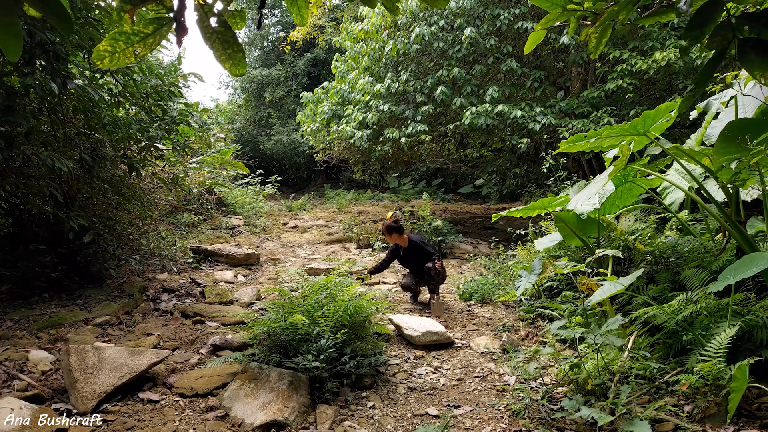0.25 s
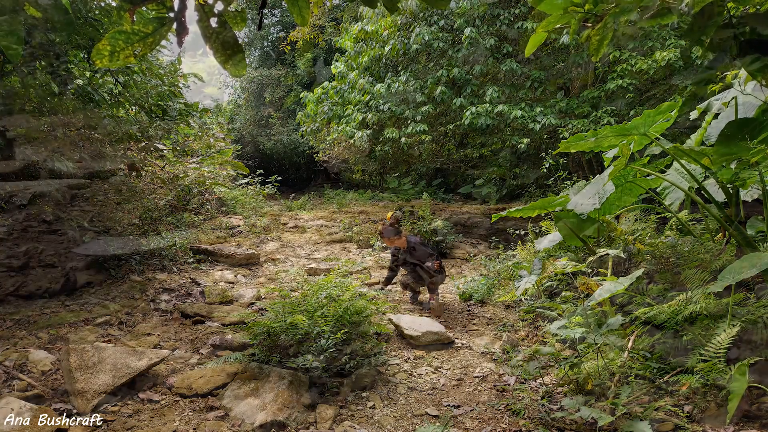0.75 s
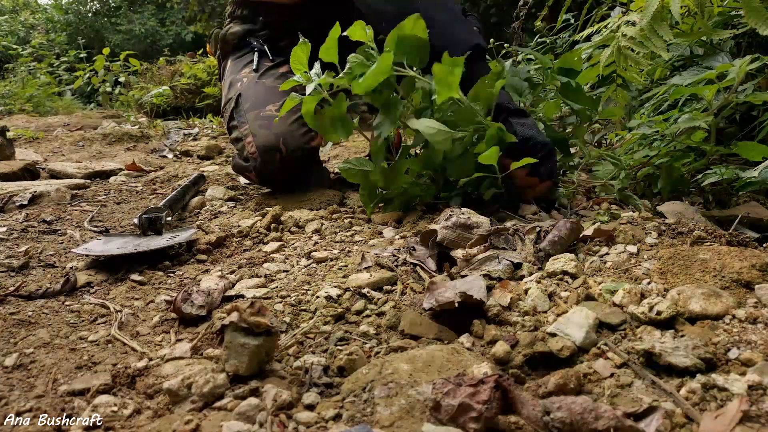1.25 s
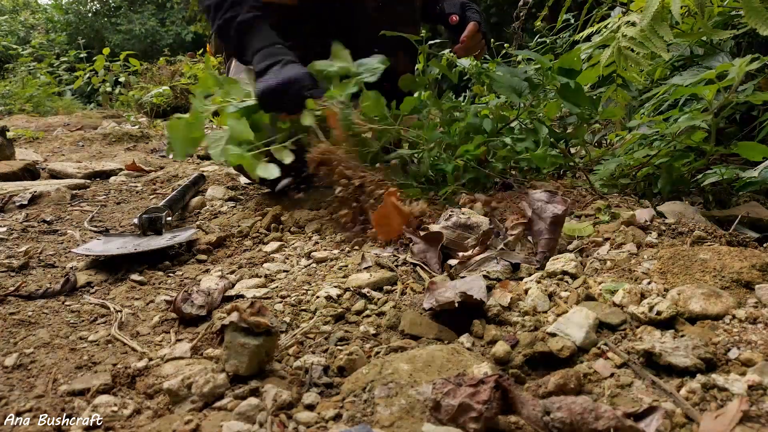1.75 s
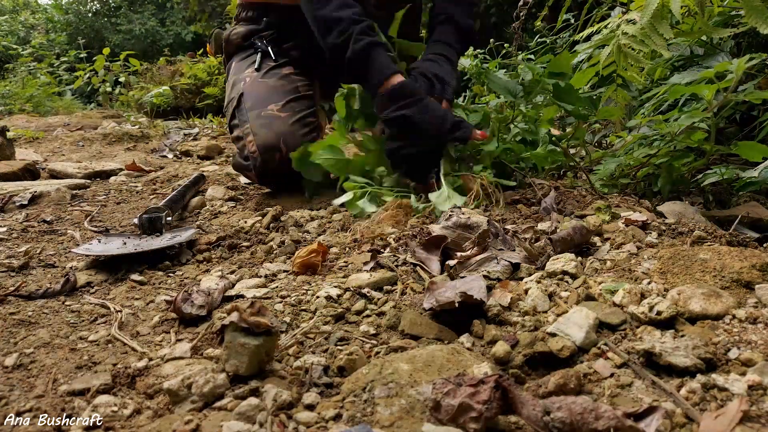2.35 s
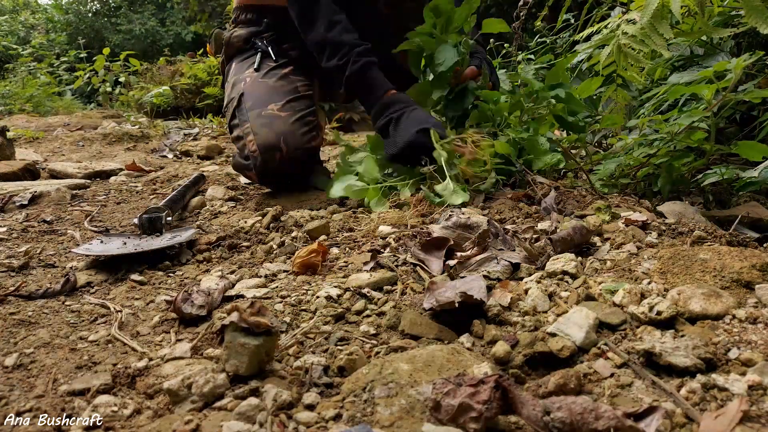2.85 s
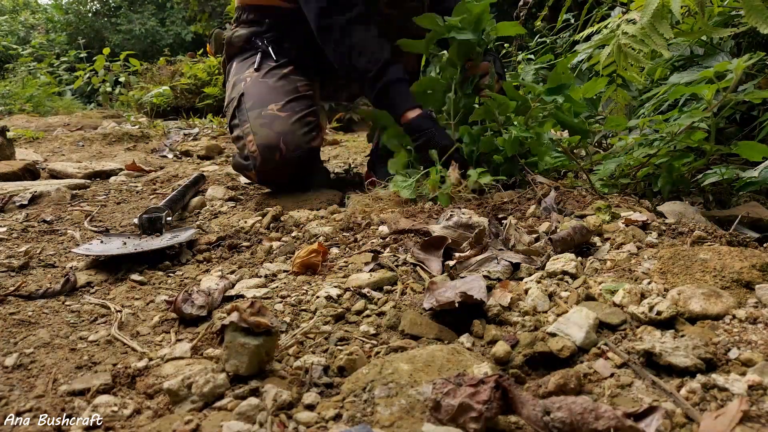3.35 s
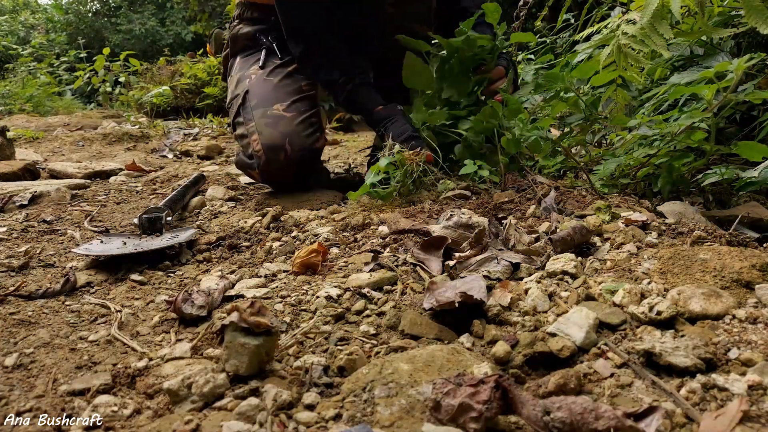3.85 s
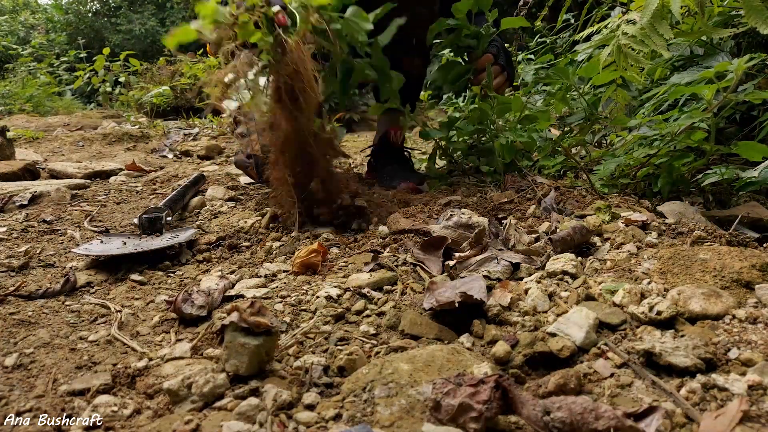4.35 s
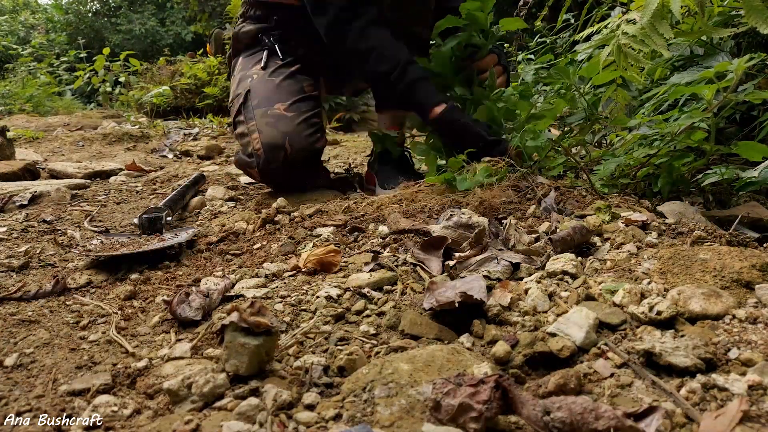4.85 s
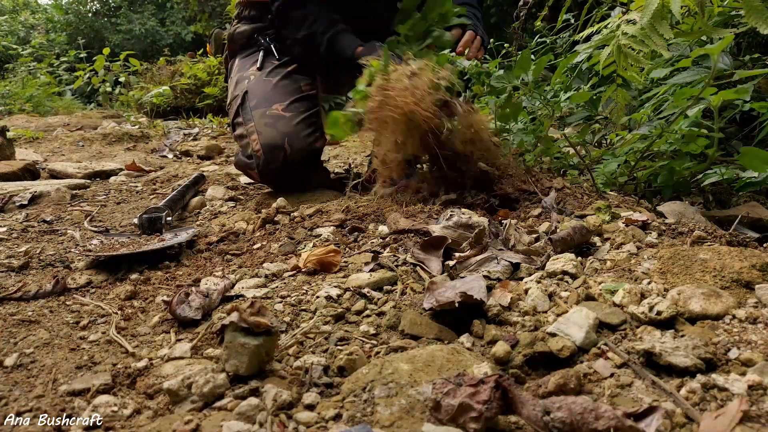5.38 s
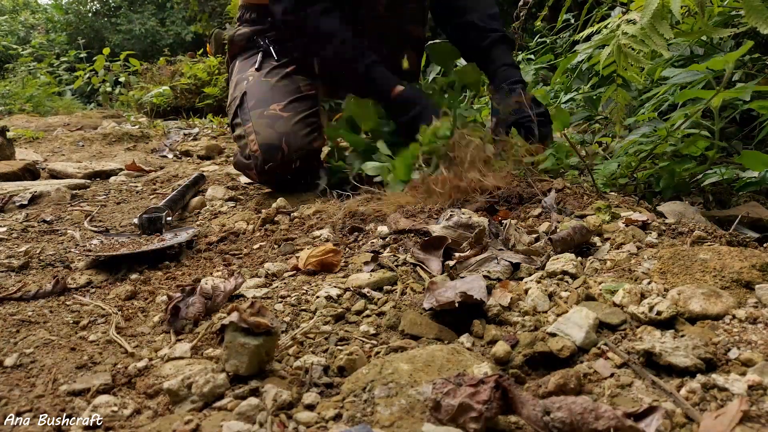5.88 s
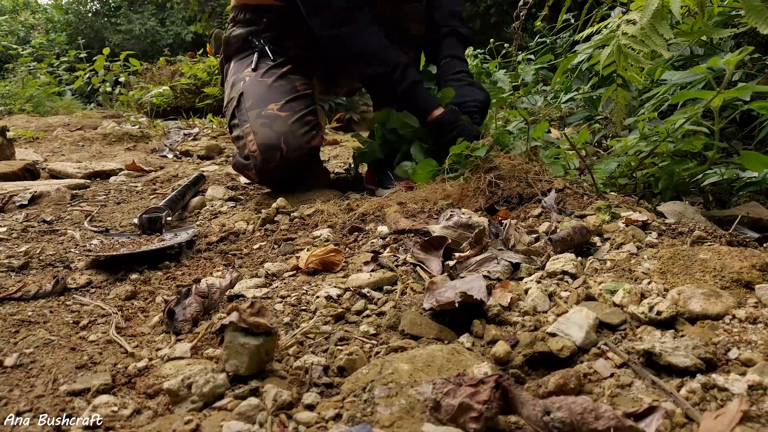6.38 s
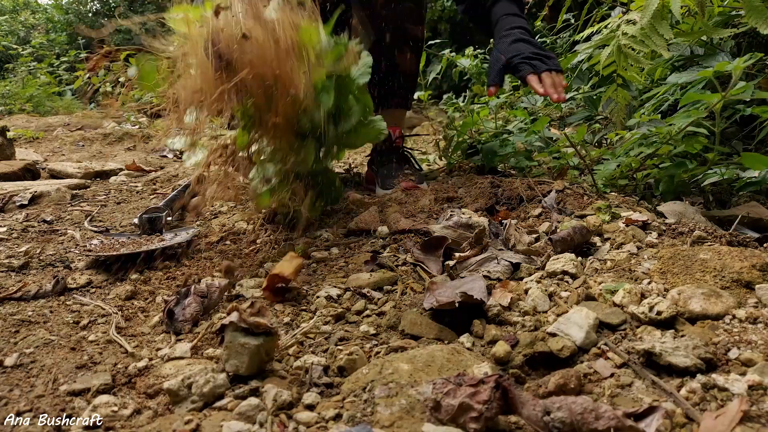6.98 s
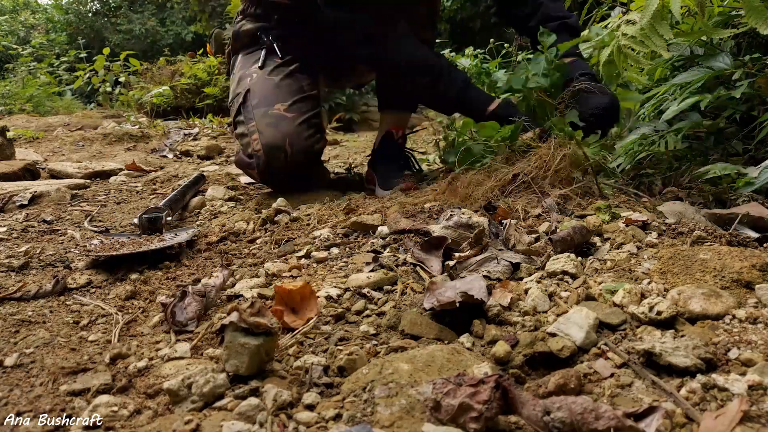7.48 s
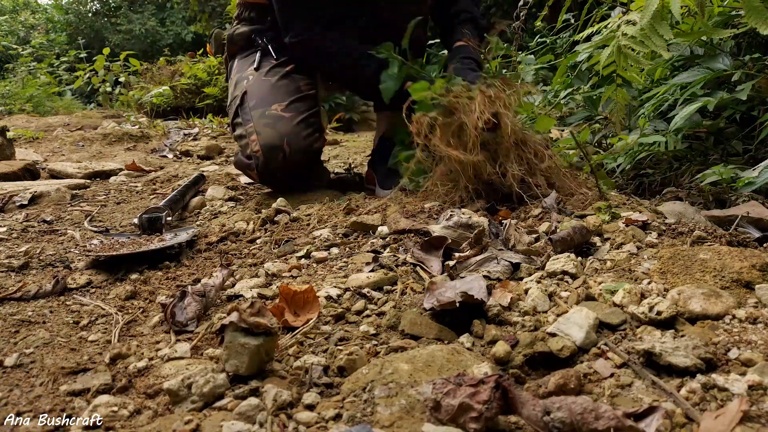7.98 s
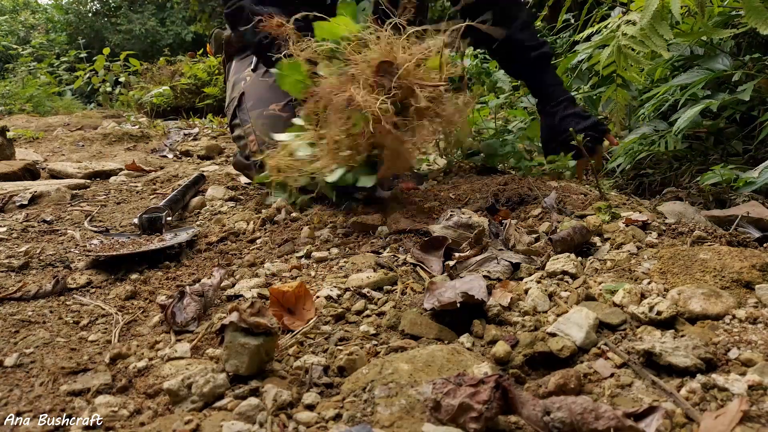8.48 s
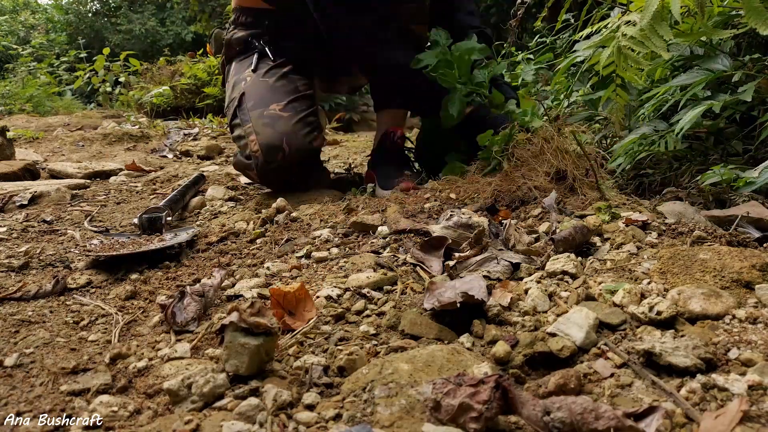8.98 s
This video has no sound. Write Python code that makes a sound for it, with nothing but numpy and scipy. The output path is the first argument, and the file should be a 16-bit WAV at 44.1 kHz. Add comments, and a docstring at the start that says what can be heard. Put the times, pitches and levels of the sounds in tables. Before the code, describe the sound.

Close stereo view of weeding on a stony forest path. Faint air and thin insect drone lie underneath. After two far, dull knocks, leaves swish in uneven sweeps, fibrous roots tear with muffled cracks and low thuds, and pebbles patter. A bright, short metallic clink comes from the left early on. Later pulls bring sharper stone clicks, thin twig snaps and brief showers of grit slightly left.

```python
"""Weeds are pulled out of stony ground on a forest path, over still air and faint insect drones.
Two distant knocks come first, as dull bursts trailed by grit. Then, close by, sweeps and tugs shape streams
of tiny damped rings into rustling leaves, creaking roots and crumbling soil; thuds and root snaps join them.
From 1.4 s pebbles click and soil showers down; from 1.9 s a steel trowel to the left clinks when touched,
ringing its modes; then dry twigs tick and loose stones knock together."""
import sys
import numpy as np
from scipy import signal
from scipy.fft import rfft, irfft, next_fast_len
from scipy.io import wavfile
from scipy.ndimage import uniform_filter1d, map_coordinates

SR = 44100
rng = np.random.default_rng(int(sys.argv[2]) if len(sys.argv) > 2 else 0)


def wrap_up_sound(samples):
    """Save the sound to the file named by the first command line argument, as 16-bit audio."""
    columns = np.atleast_2d(samples).T
    # keep every value between -1 and 1, then stretch to whole-number steps
    tamed = np.clip(columns, -1, 1)
    steps = np.round(tamed * 32767).astype(np.int16)
    wavfile.write(sys.argv[1], SR, steps)


N = 407043
LEAD_IN_S = .012  # time before contact within each burst

# Tone of dry twigs and stalks. Each row: frequency in Hz, gain in dB.
DRY_TONE = [(300, -7), (1800, -0.5), (7000, 3), (15000, -7.5)]


def amp(db):
    """Amplitude ratio of a level in dB."""
    return 10 ** (np.asarray(db) / 20)


def unit(x):
    """Scale to an RMS of 1."""
    return x / np.sqrt(np.mean(x ** 2) + 1e-20)


def along(points, hz):
    """Interpolate (Hz, value) points on a log frequency axis."""
    f, v = np.transpose(points)
    return np.interp(np.log(hz + 1), np.log(f), v)


def wobble(knots_per_s):
    """A smooth random curve through evenly spaced knots."""
    knots = rng.standard_normal(int(N * knots_per_s / SR) + 4)
    return map_coordinates(knots, [np.arange(N) * knots_per_s / SR])


def add(track, s, sound):
    """Mix a sound into a stereo track at s seconds."""
    part = track[:, round(s * SR):][:, :sound.shape[-1]]
    part += sound[..., :part.shape[1]]


def colour(x, spectrum):
    """Causal minimum-phase filter with the gain of (Hz, dB) points, built by folding the cepstrum."""
    size = x.shape[-1]
    m = 2 * next_fast_len(size // 2 + 1024)
    gain = amp(along(spectrum, np.fft.rfftfreq(m, 1 / SR)))
    cepstrum = irfft(np.log(gain))
    cepstrum[1:m // 2] *= 2
    cepstrum[m // 2 + 1:] = 0
    response = np.exp(rfft(cepstrum))
    return irfft(rfft(x, m) * response, m)[..., :size]


def spread(pair):
    """Two unrelated signals become left and right: most alike in the low mids, apart in the treble."""
    # Each row: frequency in Hz, left-right correlation.
    likeness = [(60, 0.26), (250, 0.83), (650, 0.75), (1400, 0.21), (3100, 0.3), (7000, 0)]
    size = pair.shape[1]
    m = next_fast_len(size + 512)
    turn = np.arccos(np.clip(along(likeness, np.fft.rfftfreq(m, 1 / SR)), -1, 1)) / 2
    mid, side = irfft(rfft(pair, m) * [np.cos(turn), np.sin(turn)], m)[:, :size]
    return np.array([mid + side, mid - side])


def grains(rate_per_s, top_hz, life_s, scatter_db):
    """Stereo stream of tiny damped rings, many small and a few large, of any pitch below top_hz."""
    draws = rng.random((int(rate_per_s * N / SR), 5))
    when, pitch, size, left, right = draws.T[:, :, None]
    k = np.arange(int(5 * life_s * SR))
    level_db = scatter_db * np.minimum(-np.log(1 - size), 4)
    envelope = amp(level_db) * np.exp(-k / SR / life_s)
    at = ((when * N).astype(int) + k).ravel()
    pair = []
    for phase in (left, right):
        ring = envelope * np.sin(2 * np.pi * (pitch * top_hz * k / SR + phase))
        pair.append(np.bincount(at, ring.ravel(), N)[:N])
    return unit(np.array(pair))


def shifting(pair, patchy_db):
    """The colour drifts at random over time and pitch as other leaves and crumbs come into play."""
    z = signal.stft(pair, nperseg=512)[2]
    field = uniform_filter1d(rng.standard_normal(z.shape[1:]), 4, axis=0)
    field = uniform_filter1d(field, 8, axis=1)
    return signal.istft(z * amp(patchy_db * unit(field)), nperseg=512)[1][:, :N]


def strokes(rows):
    """Strength of a series of hand movements: each swells to its peak and dies away; powers add."""
    shape = 1.48  # 1 = pointed swell, 2 = round swell
    t = np.arange(N) / SR
    power = np.zeros(N)
    for s, db, rise_s, fall_s in rows:
        near = (t > s - 5 * rise_s) & (t < s + 5 * fall_s)
        away = np.abs(t[near] - s) / np.where(t[near] < s, rise_s, fall_s)
        power[near] += (amp(db) * np.exp(-away ** shape)) ** 2
    return np.sqrt(power)


def burst(spectrum, t60, tail_db, tail_t60, lead=0, shape_db=2, crush_db=-14, crush_s=0.011):
    """One contact: grit crushes, a crack reaches the left ear lead samples early, loose bits scatter."""
    step_hz = np.geomspace(100, 16000, 32)
    t = np.arange(SR // 5) / SR - LEAD_IN_S
    after = np.maximum(t, 0)
    fall = (t >= 0) * amp(-60 * after / max(t60, .002))
    crush = amp(crush_db) * np.exp(-np.abs(t) / crush_s)
    tail = amp(tail_db - 60 * after / max(tail_t60, .01))
    scatter = np.where(t < 0, crush, tail)
    direct = fall * rng.choice([-1, 1], len(t))
    left = np.roll(direct, max(-round(lead), 0))
    right = np.roll(direct, max(round(lead), 0))
    loose = spread(scatter * rng.standard_normal((2, len(t)))) / np.sqrt(2)
    # no two stones or roots ring alike
    own_db = along(spectrum, step_hz) + shape_db * rng.standard_normal(len(step_hz))
    crack = colour(np.array([left, right]) + loose, [spectrum[0], *zip(step_hz, own_db)])
    # filtering keeps the energy of the envelopes
    return crack * np.sqrt(np.sum(fall ** 2 + scatter ** 2) / np.sum(crack ** 2) / 2)


def pulling():
    """Tugs pop fibres and crumble soil, with dry bits crackling; sweeps brush leaves into a fine hiss."""
    # Tugs at a root. Each row: peak in seconds, relative level in dB, rise in s, fall in s.
    tugs = [(1.18, -50, 0.017, 0.016), (1.3, -41.5, 0.084, 0.12), (1.519, -36, 0.082, 0.12),
            (1.75, -38.5, 0.22, 0.12), (2.383, -43, 0.1, 0.068), (2.87, -38.5, 0.035, 0.017),
            (3.03, -45, 0.033, 0.039), (3.463, -41.5, 0.062, 0.034), (3.925, -39.5, 0.05, 0.11),
            (4.13, -43.5, 0.017, 0.11), (4.329, -41.5, 0.045, 0.11), (5.22, -42.5, 0.024, 0.12),
            (5.906, -38.5, 0.046, 0.086), (6.575, -42.5, 0.12, 0.051), (6.68, -42.5, 0.062, 0.38),
            (6.975, -37, 0.014, 0.041), (7.91, -46, 0.27, 0.19), (8.36, -36.5, 0.013, 0.0096),
            (8.543, -42, 0.027, 0.063)]
    # Hands and plants through foliage. Each row: peak in seconds, relative level in dB, rise in s, fall in s,
    # leaf-edge level over leaf level in dB.
    sweeps = [(1.175, -30.5, 0.065, 0.022, -1), (1.301, -37.5, 0.019, 0.068, 2.5),
              (1.552, -27, 0.056, 0.25, 0), (1.836, -37.5, 0.066, 0.13, 3), (2.238, -35.5, 0.12, 0.28, -1),
              (2.721, -35.5, 0.057, 0.034, 0), (3.06, -37, 0.42, 0.05, -2), (3.45, -31.5, 0.037, 0.09, 3.5),
              (3.6, -35, 0.063, 0.075, 0.5), (3.713, -34.5, 0.031, 0.1, -3), (3.945, -34, 0.049, 0.21, -3),
              (4.153, -37, 0.021, 0.045, -3), (4.349, -36, 0.23, 0.11, -1), (4.58, -30.5, 0.099, 0.2, 3),
              (4.994, -45.5, 0.14, 0.11, 12), (5.651, -31, 0.023, 0.24, 2.5),
              (6.412, -47.5, 0.06, 0.025, 9), (6.726, -31.5, 0.14, 0.21, -2.5),
              (7.032, -27.5, 0.16, 0.14, -0.5), (7.204, -33.5, 0.045, 0.18, -1),
              (8.13, -37, 0.12, 0.16, -4), (8.353, -28.5, 0.061, 0.063, 2), (8.5, -34.5, 0.13, 0.095, 0.5),
              (8.682, -38.5, 0.049, 0.099, -2.5), (9.227, -37.5, 0.1, 0.05, -5)]
    # Light rustle held between sweeps. Each row: time in seconds, relative level in dB.
    holding = [(0.9, -59.5), (1.0, -37), (2.1, -51), (3.3, -37), (3.85, -53.5), (5.449, -39.5),
               (6.25, -47.5), (7.6, -44.5), (8.998, -49.5)]
    # Tones of leaves, leaf edges, roots and crumbs. Each row: frequency in Hz, gain in dB.
    leaf_tone = [(1000, -12), (1500, -12), (1800, -2.5), (2150, -3), (2500, -8), (4000, -4), (7700, -2.5),
                 (8900, -12.5), (16000, -28)]
    fizz_tone = [(5500, -22), (8200, 0), (10800, -1.5), (12700, 2.5), (16000, -3.5)]
    root_tone = [(25, -24), (60, -15), (110, -7), (175, -3.5), (260, -3), (370, 1), (650, -3.5),
                 (1100, -10.5), (3000, -23)]
    crumb_tone = [(200, -20), (680, 1.5), (1020, -2), (1350, 3.5), (2100, 2.5), (2600, -5), (4000, -6),
                  (9000, -30)]
    root_db, soil_db, leaf_db, fizz_db = -1.25, 0.15, -3, -4.5
    drag_soil_db, drag_root_db = -10.5, -14.5  # moving foliage also drags on the soil and its own roots
    crackle_db, crackle_max_db = -2, -41.5  # relative level, and the ceiling on the crackle level
    crackle_spread_db, tick_s = 14, 0.0007  # most dry bits are tiny, a few stand out; decay of a tick
    jerk_db = 0.9  # unsteadiness of the hands

    tug = strokes(tugs)
    held = amp(np.interp(np.arange(N) / SR, *np.transpose(holding), left=-120))
    foliage = np.hypot(strokes([row[:4] for row in sweeps]), held)
    edge_rows = [(s, db + bright_db, rise, fall) for s, db, rise, fall, bright_db in sweeps]
    edges = np.hypot(strokes(edge_rows), held)
    root = np.hypot(amp(root_db) * tug, amp(drag_root_db) * foliage)
    soil = np.hypot(amp(soil_db) * tug, amp(drag_soil_db) * foliage)
    dry_bits = np.minimum(amp(crackle_db) * soil, amp(crackle_max_db))
    jerk = amp(jerk_db * wobble(40))

    fibres = grains(rate_per_s=900, top_hz=1400, life_s=0.003, scatter_db=3.1)
    crumbs = grains(rate_per_s=1100, top_hz=5000, life_s=0.0005, scatter_db=3.7)
    crumbs = shifting(crumbs, patchy_db=2.8)
    leaves = grains(rate_per_s=5000, top_hz=17300, life_s=0.00022, scatter_db=2)
    leaves = shifting(leaves + rng.standard_normal((2, N)), patchy_db=1.8)
    crackle = np.zeros((2, N))
    for when, size, side in rng.random((700, 3)):
        tick = np.exp(-np.arange(256) / SR / tick_s) * rng.standard_normal((2, 256))
        pan = np.sqrt([[side], [1 - side]])
        add(crackle, when * N / SR, amp(crackle_spread_db * size ** 2) * tick * pan)

    rustle = amp(leaf_db) * foliage * unit(colour(spread(leaves), leaf_tone))
    # time-reversed leaves make an unrelated hiss
    fizz = amp(fizz_db) * edges * unit(colour(spread(leaves[:, ::-1]), fizz_tone))
    creak = root * unit(colour(spread(fibres), root_tone))
    crumble = soil * unit(colour(spread(crumbs), crumb_tone))
    crackle = dry_bits * unit(colour(shifting(crackle, patchy_db=4.5), DRY_TONE))
    return jerk * (creak + crumble + rustle + fizz) + crackle


def snaps():
    """A root breaks under the soil with a short, muffled crack."""
    # Each row: time in seconds, relative level in dB.
    snap_rows = [(1.325, -21.5), (1.632, -27), (1.647, -23), (2.823, -25), (2.944, -21), (3.031, -21.5),
                 (3.884, -23.5), (3.892, -22), (3.915, -22.5), (3.937, -23), (3.949, -23.5), (4.114, -18),
                 (4.133, -22), (4.155, -30), (4.182, -29), (4.324, -26), (5.153, -28.5), (5.2, -22.5),
                 (5.243, -24), (5.291, -25.5), (5.32, -24.5), (6.8, -22.5), (6.544, -22), (6.566, -17.5),
                 (7.125, -18), (7.552, -27), (7.866, -27.5), (7.902, -25), (7.942, -28), (8.506, -25),
                 (9.026, -29.5), (9.052, -20), (9.158, -23.5), (9.172, -24)]
    # Each row: frequency in Hz, gain in dB.
    snap_tone = [(25, -31), (100, -7.5), (200, 1.5), (450, 5), (1200, -2), (2100, -2), (2900, -19.5),
                 (6000, -20.5), (16000, -28)]
    out = np.zeros((2, N))
    for s, db in snap_rows:
        crack = burst(snap_tone, t60=.006, tail_db=-18, tail_t60=.07, crush_db=-26)
        add(out, s - LEAD_IN_S, amp(db + 7.5) * crack)
    return out


def thuds():
    """The earth around a root springs back with a soft, low thud."""
    # Each row: time in seconds, relative level in dB.
    thud_rows = [(1.167, -38), (1.325, -29.5), (1.424, -34), (1.502, -28.5), (1.531, -28.5), (1.634, -36),
                 (2.823, -25), (2.862, -32), (2.878, -32), (2.944, -30.5), (3.012, -33), (3.033, -30.5),
                 (4.113, -24.5), (6.569, -35), (7.925, -37), (8.364, -35), (9.16, -38)]
    # Each row: frequency in Hz, gain in dB.
    earth_tone = [(40, -26), (100, -9), (180, 2.5), (330, -7), (650, -17.5), (1500, -32)]
    out = np.zeros((2, N))
    for s, db in thud_rows:
        thud = burst(earth_tone, t60=0.038, tail_db=-21, tail_t60=0.087, crush_db=-15)
        add(out, s - LEAD_IN_S, amp(db + 9.0) * thud)
    return out


def twigs():
    """Each dry twig or stalk breaks with one thin, bright tick."""
    # Each row: time in seconds, relative level in dB.
    twig_rows = [(2.024, -23), (2.039, -23), (2.258, -18), (3.075, -20), (3.091, -17.5), (3.559, -25),
                 (4.166, -22), (4.716, -19), (4.962, -22), (5.819, -17), (6.711, -16), (6.919, -18),
                 (7.073, -14), (7.087, -15), (7.132, -19), (7.322, -21), (7.362, -21), (7.703, -25),
                 (7.794, -28), (8.391, -18), (8.4195, -15), (8.576, -20.5), (8.731, -28)]
    out = np.zeros((2, N))
    for s, db in twig_rows:
        tick = burst(DRY_TONE, t60=0.0092, tail_db=-12, tail_t60=.04, crush_db=-22)
        add(out, s - LEAD_IN_S, amp(db) * tick)
    return out


def pebbles():
    """Each pebble or clod lands with a dry click over a duller body, with its own treble and contact time."""
    # Each row: time in seconds, relative level in dB, relative body in dB, relative treble in dB,
    # left over right in dB, contact t60 in s.
    pebble_rows = [(1.4502, -17.5, -11.5, -14, 4.5, 0.014), (1.4596, -12, -16, -15, 9, 0.01),
                   (1.525, -19.5, -10.5, -11, 3, 0.027), (1.5875, -12, -18, -15, -1, 0.022),
                   (1.5914, -13.5, -17, -14, 4, 0.02), (1.6459, -10.5, -14, -23, 3, 0.028),
                   (1.8707, -17, -36, -10, 3.5, 0.012), (2.2246, -19.5, -13, -21, 0.5, 0.0097),
                   (2.2388, -16, -15.5, -29, 3, 0.0091), (2.8177, -24.5, -5.5, -22, 4, 0.018),
                   (3.0125, -15, -9, -17, 0.5, 0.004), (3.043, -24.5, -24, -24, 0, 0.0071),
                   (4.6048, -18.5, -14.5, -2, 5.5, 0.014), (4.6357, -15, -16, -18, 5, .013),
                   (4.6437, -12, -20, -18, 6.5, 0.027), (5.316, -23, -13, -11, 3, 0.012),
                   (5.6415, -13.5, -27, -19, 5.5, 0.039), (5.6928, -9, -24, -6, -1.5, 0.006),
                   (5.7039, -12, -24, -19, 2, 0.01), (5.77, -27, -4.5, -21, 7, 0.018),
                   (6.876, -8.5, -16, 2, 4.5, 0.089), (6.9994, -7, -23, -2, 4, 0.022),
                   (7.223, -22.5, -14.5, -4, 12, 0.013), (7.3872, -20, -20, -22, 3.5, 0.01),
                   (7.5717, -29.5, -9, -24, 3.5, 0.012), (7.8335, -14, -26, -7.5, -1.5, 0.024),
                   (8.3211, -18.5, -33, -21, 10.5, 0.0088), (8.3522, -9.5, -21, -17, -1.5, 0.016),
                   (8.36, -11.5, -14, -9, 3.5, 0.024), (8.3836, -14, -28, -28, 0.5, 0.0052),
                   (8.5049, -11.5, -16.5, -15, -0.5, 0.04), (8.6953, -22.5, -14, -12, 0, 0.027)]
    contact_s = 0.0086  # a longer contact spreads the same energy into a crunch
    dull = [(25, -23), (60, -4.5), (400, -0.5), (2300, 4.0), (4500, 2.5), (12000, -40)]
    out = np.zeros((2, N))
    for s, db, body_db, treble_db, pan_db, t60 in pebble_rows:
        lead = 1.5 * pan_db  # samples; the nearer ear hears it first
        bright = [(25, -68), (2000, -5.0), (3500, 3), (7500, 10.5), (12000, treble_db + 19.0)]
        sharp = np.sqrt(contact_s / max(t60, .002))
        sharp_db = 20 * np.log10(sharp)
        contact = dict(t60=t60, tail_db=-14 - sharp_db, tail_t60=.05, lead=lead, crush_db=-22 - sharp_db)
        click = burst(bright, **contact)
        body = burst(dull, **contact)
        level = sharp * amp(db + pan_db * np.array([[.5], [-.5]]))
        add(out, s - LEAD_IN_S, level * (amp(7.0) * click + amp(body_db + 19.0) * body))
    return out


def stones():
    """Two loose stones meet with a short crack, its spectrum peaking at a given pitch."""
    # Each row: time in seconds, relative level in dB, pitch in Hz.
    stone_rows = [(2.24, -15.5, 2760), (2.817, -15.5, 2300), (4.547, -10.5, 3500), (6.113, -31, 2920),
                  (7.002, -14, 2900), (7.387, -18.5, 1080), (7.663, -26.5, 3260), (7.977, -27, 2880)]
    out = np.zeros((2, N))
    for s, db, hz in stone_rows:
        tone = [(hz / 10, -12), (hz / 1.3, -9), (hz, 0), (hz * 2, -13), (hz * 10, -40)]
        crack = burst(tone, t60=.02, tail_db=-16, tail_t60=.05, crush_db=-26)
        add(out, s - LEAD_IN_S, amp(db - 2) * crack)
    return out


def blade():
    """Decaying modes of the trowel, new for each touch; each mode's phase drifts at random, roughening the ring."""
    # Each row: frequency in Hz, relative level in dB, t60 in s.
    modes = [(1530, -17, .13), (2314, -17, .11), (4400, -8, .19), (4931, -10, .08), (5146, -4, .08),
             (5335, -2, .09), (6285, -8, .1), (7265, 0, .1), (8425, -3, .11), (9390, -6, .09),
             (10830, -9, .08), (12070, -10, .08), (12586, -10, .07), (13390, -9, .07), (14018, -5, .06)]
    t = np.arange(SR // 5) / SR
    ring = np.zeros((2, len(t)))
    for hz, db, t60 in modes:
        level = amp(db + rng.standard_normal((2, 1)) - 60 * t / t60)
        drift = np.cumsum(rng.standard_normal(len(t))) * np.sqrt(2 / SR)  # random walk, in cycles
        phase = rng.random((2, 1)) / 2
        ring += level * np.sin(2 * np.pi * (hz * t + drift + phase))
    return ring / np.abs(ring).max()


def clinks():
    """Stones, soil or a plant touch the steel blade, to the left, with a noisy skitter."""
    # Each row: time in seconds, relative level in dB.
    clink_rows = [(1.893, -10.5), (1.904, -12.5), (1.915, -14.5), (1.995, -16), (4.489, -21.5)]
    tone = [(100, -30), (2500, -14), (5000, 0), (15000, -1)]
    out = np.zeros((2, N))
    for s, db in clink_rows:
        skitter = burst(tone, t60=.025, tail_db=-3, tail_t60=.08)
        add(out, s, amp(db + 1.5) * blade())
        add(out, s - LEAD_IN_S, amp(db - 4) * skitter)
    return out * amp([[1.5], [-1.5]])


def showers():
    """Loose grit shaken from a root ball rains on the ground, a little to the left."""
    # Each row: middle in seconds, half length to 1/e in s, relative level in dB.
    shower_rows = [(1.616, 0.098, -48), (4.49, 0.03, -37), (4.59, 0.075, -30), (5.7, 0.044, -25),
                   (7.01, 0.049, -30), (8.352, 0.025, -26.5)]
    # Each row: frequency in Hz, gain in dB.
    grit_tone = [(100, -27), (600, -1.5), (2800, -21.5), (4500, 1), (6800, 10), (9500, -3.5), (16000, -18)]
    t = np.arange(N) / SR
    flow = sum(amp(db) * np.exp(-((t - s) / half_s) ** 2) for s, half_s, db in shower_rows)
    grit = grains(rate_per_s=910, top_hz=17000, life_s=0.00023, scatter_db=0.5)
    grit = shifting(grit, patchy_db=3.0)
    return flow * unit(colour(spread(grit), grit_tone)) * amp([[1.2], [-1.2]])


def knocks():
    """Far blows on stony ground arrive dull, trailed by trickling grit and the answer of the trees."""
    # Each row: time in seconds, relative level in dB.
    knock_rows = [(0.326, -17.5), (0.406, -20.5)]
    blow_tone = [(60, -22), (300, -7), (600, 1), (1200, 2), (2500, -4), (5000, -30)]
    trail_tone = [(50, -15), (400, -3), (2300, -3.0), (4500, -9.5), (15000, -22)]
    out = np.zeros((2, N))
    for s, db in knock_rows:
        blow = burst(blow_tone, t60=.009, tail_db=-25, tail_t60=.1, shape_db=1, crush_db=-35)
        trail = burst(trail_tone, t60=0.091, tail_db=11.0, tail_t60=0.42, shape_db=0.0)
        add(out, s - LEAD_IN_S, amp(db) * blow + amp(db - 31.5) * trail)
    return out


def drone(hz, width_hz):
    """A tone blurred to a narrow band by slow random changes of strength and phase."""
    t = np.arange(N) / SR
    drift = wobble(2 * width_hz) + 1j * wobble(2 * width_hz)
    return unit(np.real(drift * np.exp(2j * np.pi * hz * t)))


def forest():
    """The still air of the woods as coloured noise, with the thin drone of far insects."""
    # Each row: frequency in Hz, gain in dB.
    air_tone = [(25, -13), (65, 2.5), (200, -2.5), (500, -5), (1100, -11), (2000, -9.5), (4500, -17),
                (7000, -16), (11000, -26), (16000, -16.5)]
    # Each row: pitch in Hz, width in Hz, RMS level in dB.
    insects = [(2126, 39, -76), (5750, 90, -76)]
    out = amp(-60.5) * unit(colour(spread(rng.standard_normal((2, N))), air_tone))
    for hz, width_hz, db in insects:
        out += amp(db) * np.array([drone(hz, width_hz), drone(hz, width_hz)])
    return out


def scene():
    """Sum of all sources."""
    work = pulling() + snaps() + thuds() + twigs()
    falling = pebbles() + stones() + clinks() + showers()
    return work + falling + knocks() + forest()


def record(dry):
    """Remove everything above the band limit."""
    top_hz = 16050
    m = next_fast_len(N + SR // 2)
    return irfft(rfft(dry, m) * (np.fft.rfftfreq(m, 1 / SR) < top_hz), m)[:, :N]


dry = scene()
out = record(dry)
wrap_up_sound(out)
```